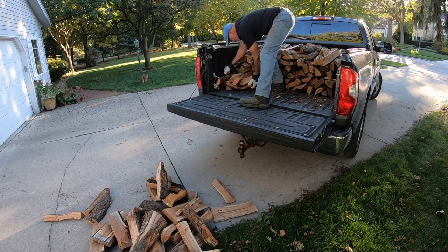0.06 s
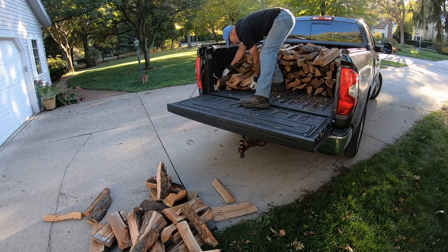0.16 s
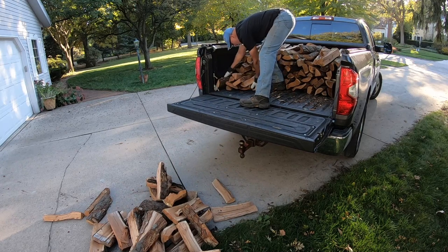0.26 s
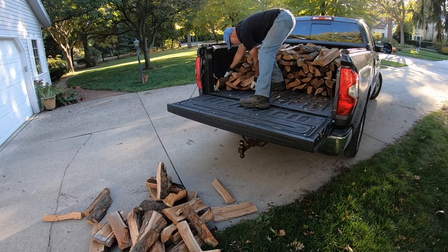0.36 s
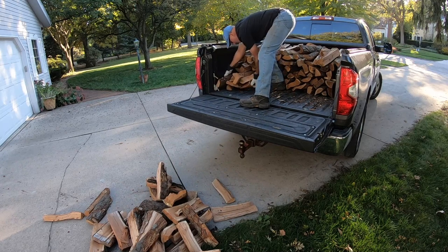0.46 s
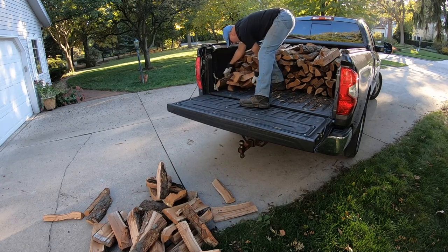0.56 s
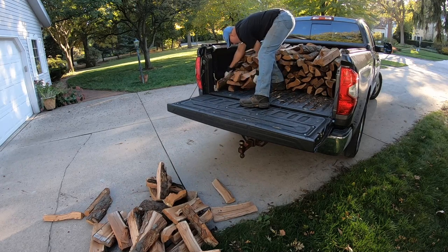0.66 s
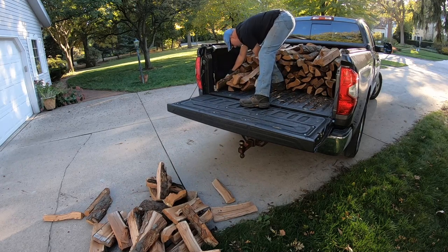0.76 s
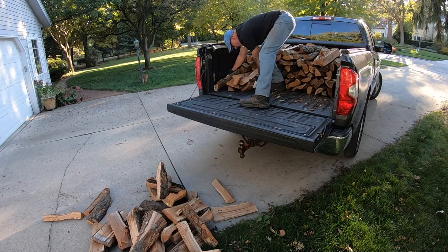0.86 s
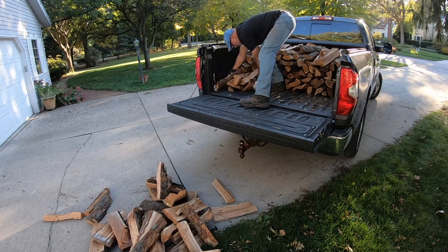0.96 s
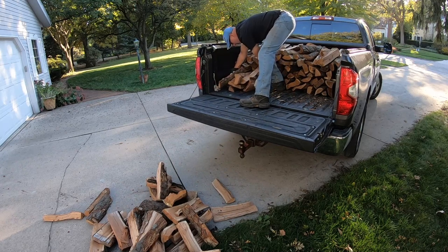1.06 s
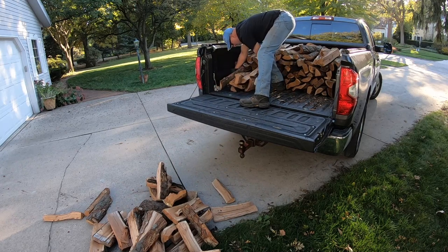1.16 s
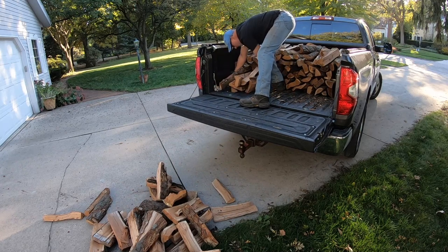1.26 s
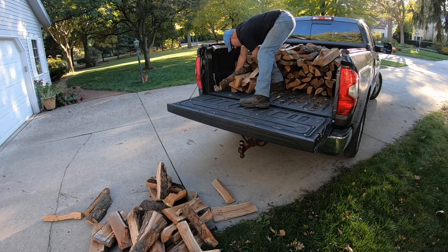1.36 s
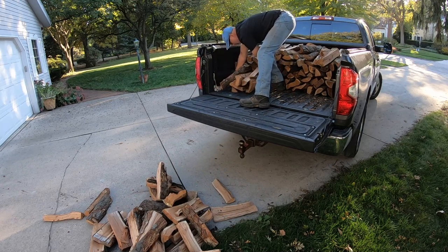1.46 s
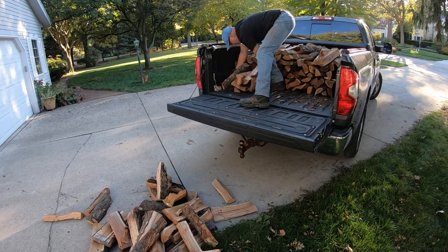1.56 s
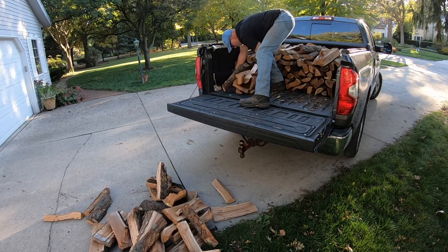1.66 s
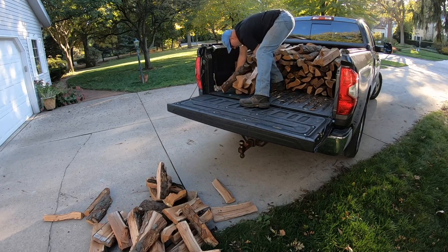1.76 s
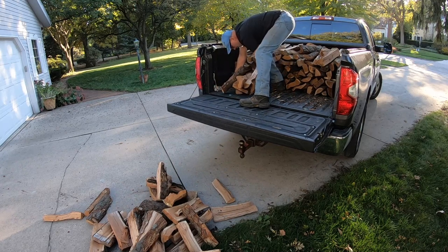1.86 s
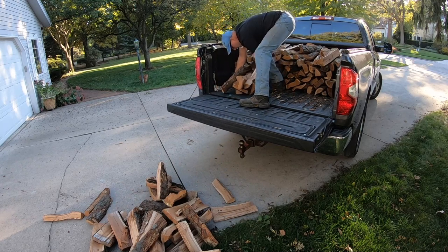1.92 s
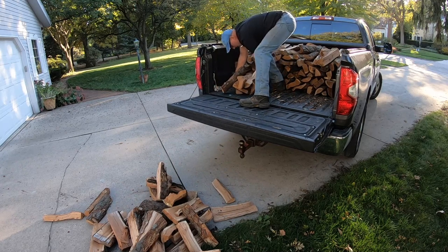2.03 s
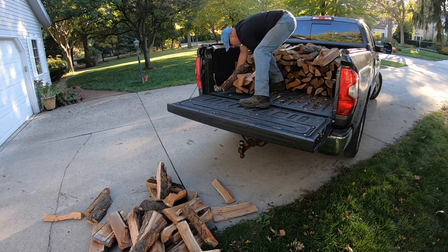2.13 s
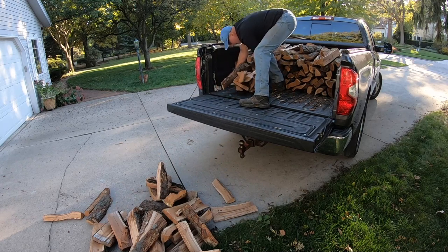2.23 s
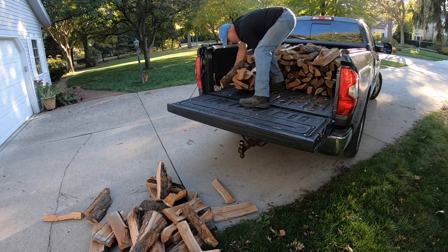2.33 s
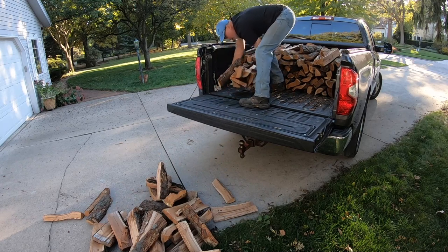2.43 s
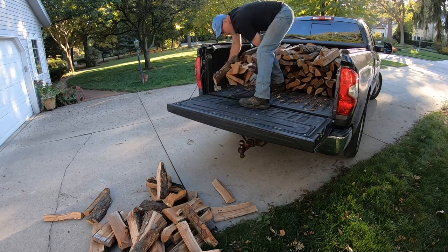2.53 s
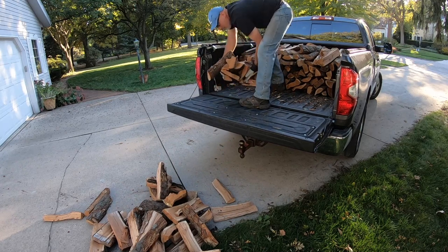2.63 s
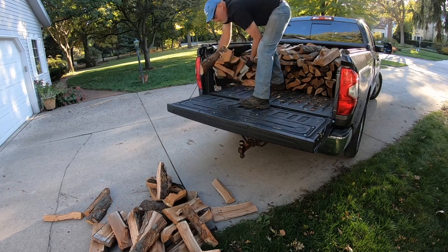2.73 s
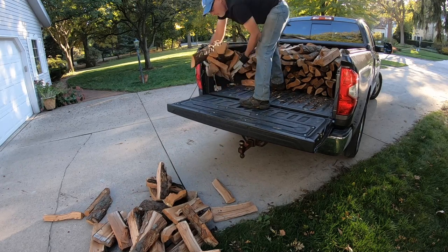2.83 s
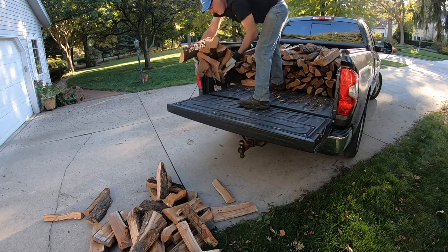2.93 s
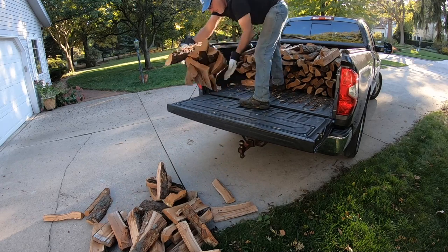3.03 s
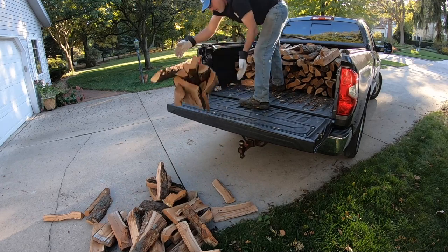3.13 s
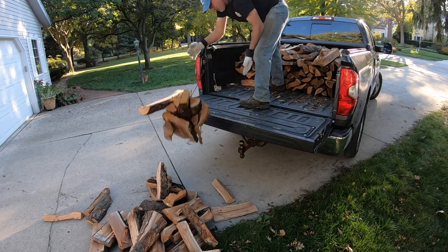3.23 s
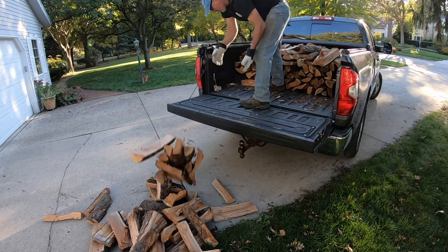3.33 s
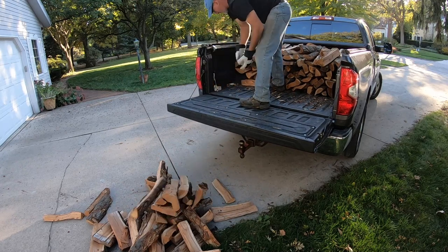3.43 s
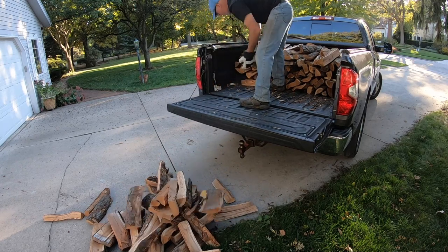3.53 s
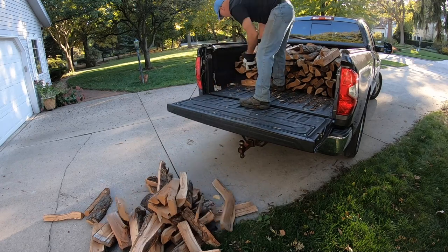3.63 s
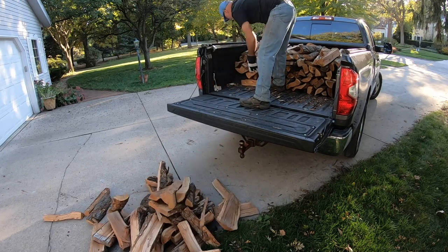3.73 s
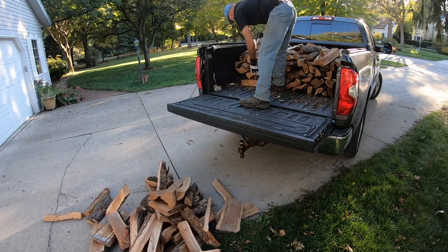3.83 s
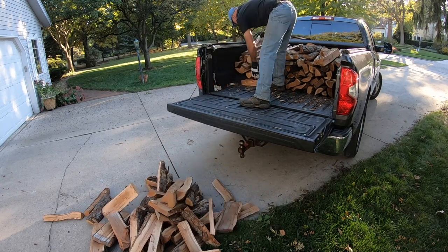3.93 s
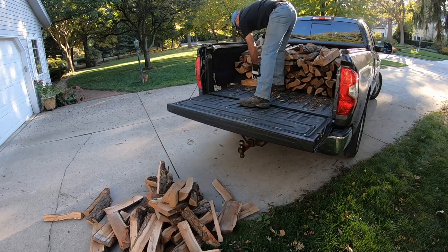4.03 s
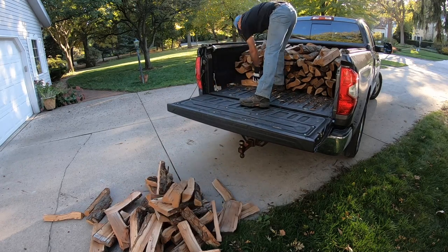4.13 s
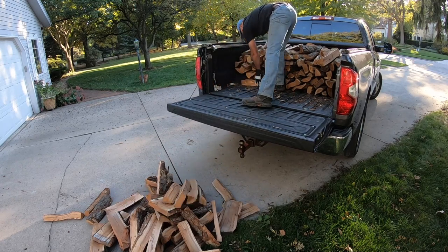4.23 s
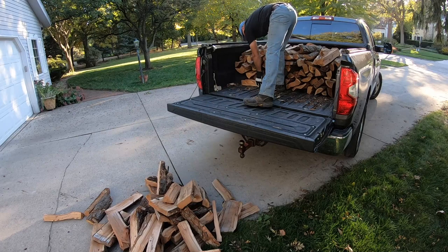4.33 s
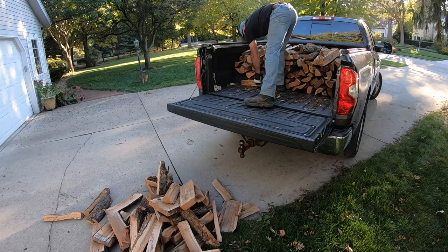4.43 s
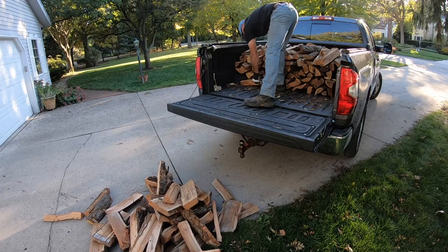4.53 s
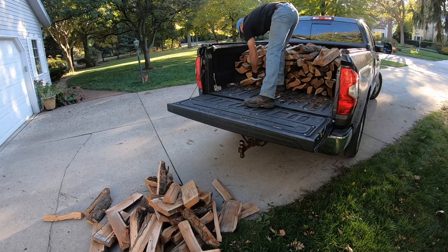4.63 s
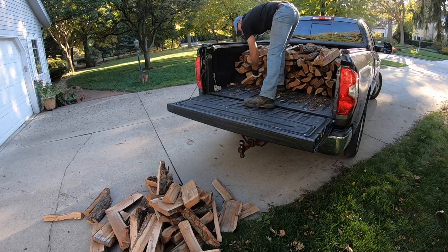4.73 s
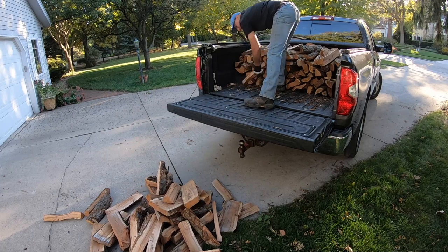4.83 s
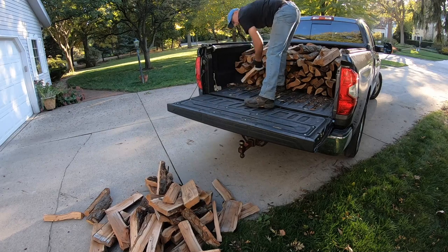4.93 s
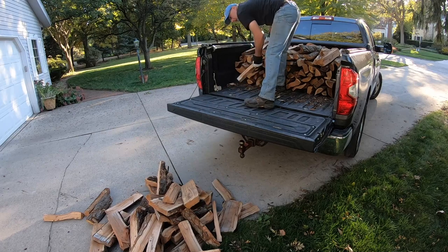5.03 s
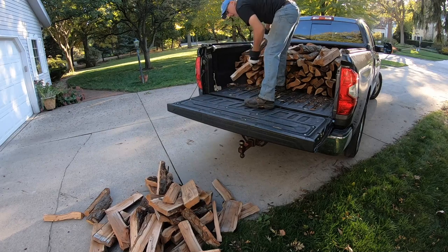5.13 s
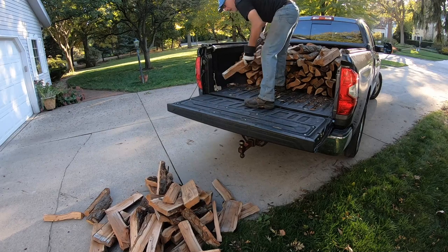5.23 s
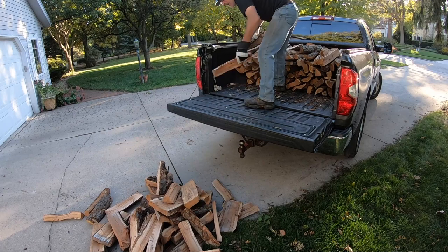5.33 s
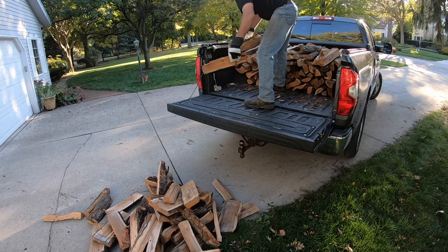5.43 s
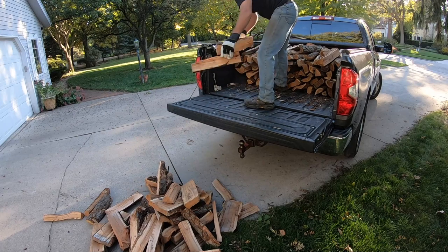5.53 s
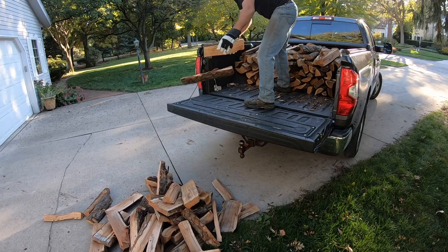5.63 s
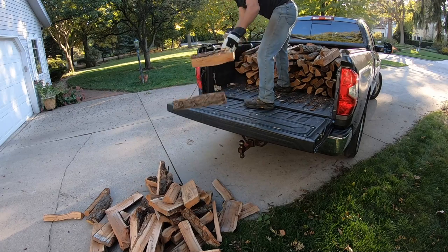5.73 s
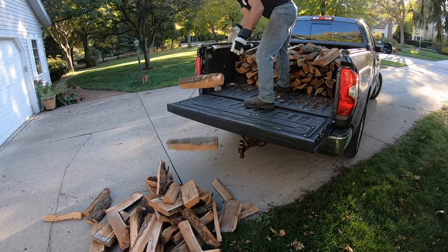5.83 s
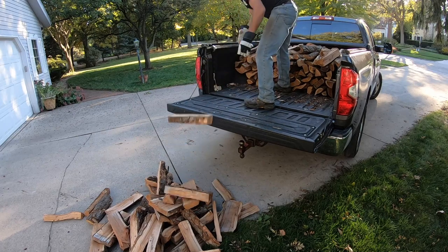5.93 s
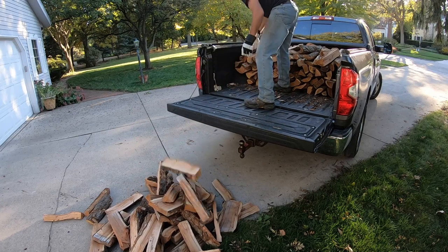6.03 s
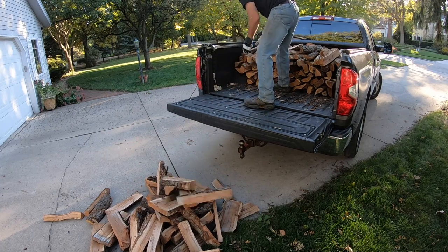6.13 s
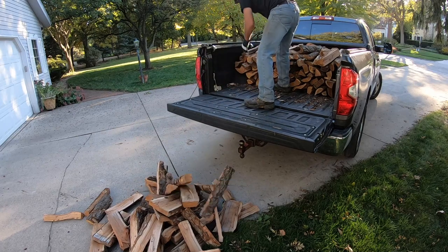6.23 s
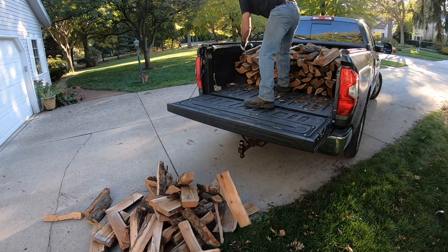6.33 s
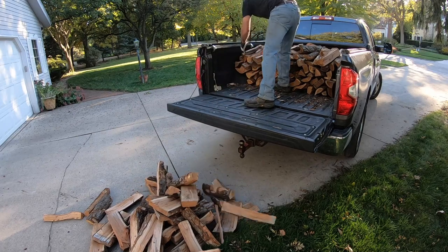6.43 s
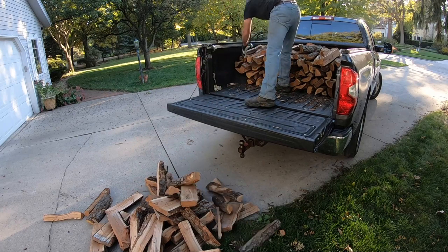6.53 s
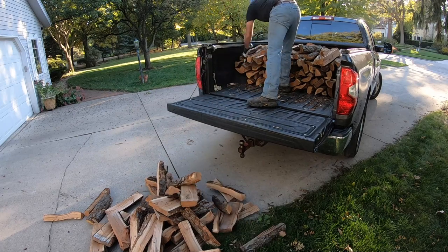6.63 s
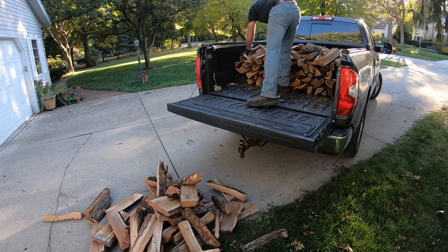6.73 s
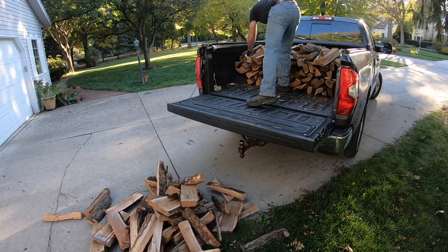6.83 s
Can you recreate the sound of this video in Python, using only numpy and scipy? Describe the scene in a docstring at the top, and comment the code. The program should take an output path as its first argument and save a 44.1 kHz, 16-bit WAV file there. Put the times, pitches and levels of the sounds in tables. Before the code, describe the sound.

Split logs drag and bump on a hollow truck bed, an armful crashes onto a woodpile on concrete, then two dry logs land ringing.

```python
"""Firewood off a pickup bed

Split logs drag and bump on the hollow bed, an armful crashes onto the pile on a concrete driveway
and settles, then two dry logs land and ring. Blows are bursts of decaying modes, irregular for each
log; dragging and sliding are dense random clicks, coloured and ridden in level. A noise tail throws
the blows back from the garage front, and steady coloured noise makes the quiet outdoor hush."""
import sys
import numpy as np
from scipy import signal
from scipy.fft import rfft, irfft, next_fast_len
from scipy.io import wavfile

SR = 44100
rng = np.random.default_rng(int(sys.argv[2]) if len(sys.argv) > 2 else 0)


def master_out(mix):
    """Clip the mix to full scale and print it as 16-bit PCM to the path in sys.argv[1]."""
    frames = np.transpose(np.atleast_2d(mix))
    ceiling = np.clip(frames, -1, 1)
    pcm = np.round(ceiling * 32767).astype(np.int16)
    wavfile.write(sys.argv[1], SR, pcm)


N = 302967
TIME = np.arange(N) / SR


def from_db(db):
    """Decibels to gain."""
    return 10 ** (np.asarray(db) / 20)


def rms_one(x):
    """Scale to unit rms."""
    return x / np.sqrt(np.mean(x ** 2) + 1e-20)


def in_time(rows):
    """Read each column of a time curve at every sample."""
    s, *columns = np.transpose(rows)
    return [np.interp(TIME, s, c) for c in columns]


def at_hz(points, hz):
    """Read a spectrum on a log-frequency axis."""
    f, value = np.transpose(points)
    return np.interp(np.log(hz + 1e-9), np.log(f), value)


def colour(x, spectrum):
    """Give a signal a smooth spectrum."""
    length = x.shape[-1]
    size = next_fast_len(length)
    gains = from_db(at_hz(spectrum, np.fft.rfftfreq(size, 1 / SR)))
    return irfft(rfft(x, size) * gains, size)[..., :length]


# stereo width over frequency: pitch_hz, side_minus_mid_db
WIDTH = [(30, 11), (70, -27.5), (180, -23.5), (380, -14), (750, -3.5), (2300, -8.5), (4400, -7),
         (9000, -8.5)]


def widen(pair):
    """Two unrelated signals become mid and side, spread by the width curve."""
    return pair[0] + colour(pair[1], WIDTH) * [[1], [-1]]


def panned(lean_db):
    """Left and right gains; a positive lean favours the left."""
    return from_db(np.array([[.5], [-.5]]) * lean_db)


def add(out, s, sound):
    """Mix a sound in at a time."""
    at = int(np.clip(round(s * SR), 0, N - 1))
    out[:, at:at + sound.shape[-1]] += sound[..., :N - at]


# relative spectrum of the outdoor air: pitch_hz, level_db (per Hz)
HUSH = [(20, -21.5), (60, 4.5), (100, -7.5), (160, 2.5), (400, -17.5), (800, -9), (1300, -6.5), (2000, -13),
        (3000, -21.5), (6000, -24.5), (10000, -48), (16000, -75)]
HUSH_DB = -53.5  # rms


def outdoor_hush():
    """Steady noise with most of its weight in the lows."""
    return from_db(HUSH_DB) * rms_one(colour(widen(rng.standard_normal((2, N))), HUSH))


def echoes(x, t60, delay_s, spectrum):
    """Scattered reflections that build up after each sound and die away."""
    t = np.arange(SR) / SR
    onset = 1 - np.exp(-(t / delay_s) ** 2)
    tail = widen(rng.standard_normal((2, SR))) * from_db(-60 * t / t60) * onset
    tail = colour(tail / np.sqrt(np.sum(tail[0] ** 2)), spectrum)
    return signal.fftconvolve(x, tail[:, :SR * 3 // 4], axes=1)[:, :N]


def garage_echo(direct):
    """The garage front throws the blows back as a soft, diffuse tail."""
    spectrum = [(100, -15.5), (500, -29.5), (1300, -22.5), (5000, -17), (8000, -18), (12000, -22)]
    return echoes(direct, t60=0.74, delay_s=0.0093, spectrum=spectrum)


def friction(spectrum, per_s, uneven_db):
    """Rough surfaces catch and slip: dense tiny clicks of uneven size, at unit rms."""
    clicks = rng.random(N) < per_s / SR
    sizes = from_db(uneven_db * np.minimum(rng.exponential(1, N), 4)) * clicks
    return rms_one(colour(widen(sizes * rng.standard_normal((2, N))), spectrum))


CATCHES_PER_S, CATCH_DB = 28, 2.5  # sliding wood catches and lets go


def catching():
    """Uneven stick and slip, as a wandering level in dB."""
    steps = rng.standard_normal(1000)
    return CATCH_DB * np.interp(TIME * CATCHES_PER_S, np.arange(len(steps)), steps)


SKID_ONSET_S = 0.0019  # wood takes a moment to start sliding


def dying_power(rows, fall_db_per_s):
    """Each event sets wood sliding with a power that builds quickly and that friction drains away."""
    kicks, keep = np.zeros(N), from_db(-fall_db_per_s / SR) ** 2
    for s, db, *_ in rows:
        kicks[int(np.clip(s * SR, 0, N - 1))] += from_db(db) ** 2
    lag = np.exp(-2 / (SKID_ONSET_S * SR))
    eased = signal.lfilter([(1 - lag) ** 2], [1, -2 * lag, lag ** 2], kicks + 1e-18)
    return signal.lfilter([1], [1, -keep], eased)


def skid(blows, share_db, fall_db_per_s):
    """Power of the short skid that follows every blow."""
    return from_db(share_db) ** 2 * dying_power(blows, fall_db_per_s)


# bark dragged over bark: start_s, length_s, level_db (before the layer trims)
SCRAPES = [(0.127, 0.085, -46.5), (0.575, 0.16, -52.5), (1.022, 0.24, -43), (1.55, 0.32, -40.5),
           (2.5, 0.11, -59), (2.944, 0.18, -58), (3.16, 0.083, -66.5), (3.82, 0.32, -52.5),
           (4.92, 0.19, -59.5), (5.521, 0.12, -55), (5.659, 0.083, -41.5), (6.585, 0.11, -42.5)]
SCRAPE_RUB_DB = -5  # the wood under the bark, relative to the scrape


def scrape_power():
    """Every pull speeds up and slows down in one smooth arch."""
    power = np.zeros(N)
    for s, length, db in SCRAPES:
        arch = np.sin(np.pi * np.clip((TIME - s) / length, 0, 1))
        power += (from_db(db) * arch) ** 2
    return power


# how hard the wood is being shifted, as the rumble it makes before trim: time_s, level_db
EFFORT = [(0, -33.5), (0.42, -39), (0.6, -31), (0.88, -31.5), (1.0, -40), (1.15, -33.5), (1.45, -34),
          (1.7, -43), (1.86, -34.5), (2.1, -38), (2.3, -44), (2.6, -43), (2.85, -62.5), (4.15, -61),
          (4.45, -41), (4.88, -55.5), (5.15, -53), (5.95, -57)]
# the pile is upset and small pieces trickle down: start_s, level_db (before the layer trims)
SLIDES = [(3.43, -43), (6.03, -49), (6.58, -49)]
SLIDE_FALL_DB_PER_S, SLIDE_RUB_DB, SLIDE_RUMBLE_DB = 19, 0, 1  # shares relative to the grit
REFERENCE_EFFORT_DB = -33
RUB_DB, GRIT_DB = -44, -48  # at the reference effort, before trims
GRIT_FOLLOWS = 1.25  # dB of grit per dB of effort: bark breaks more under a firm pull


def sliding_levels():
    """Levels in dB: shifting, skids after blows, scrapes and the settling pile add up in power."""
    effort_db, = in_time(EFFORT)
    pull_db = effort_db - REFERENCE_EFFORT_DB
    scrapes, slides = scrape_power(), dying_power(SLIDES, SLIDE_FALL_DB_PER_S)
    rumble = (from_db(effort_db) ** 2 + slides * from_db(SLIDE_RUMBLE_DB) ** 2
              + skid(BUMPS, share_db=-16.0, fall_db_per_s=129)
              + skid(THUMPS, share_db=-21.5, fall_db_per_s=124))
    rub = (from_db(RUB_DB + pull_db) ** 2 + slides * from_db(SLIDE_RUB_DB) ** 2
           + scrapes * from_db(SCRAPE_RUB_DB) ** 2
           + skid(KNOCKS, share_db=-29, fall_db_per_s=107))
    grit = (from_db(GRIT_DB + GRIT_FOLLOWS * pull_db) ** 2 + slides + scrapes
            + skid(SNAPS, share_db=-26.5, fall_db_per_s=229))
    catch_db = catching()
    return [10 * np.log10(power) + catch_db for power in (rumble, rub, grit)]


# relative spectrum of the low drag: pitch_hz, level_db (per Hz)
RUMBLE = [(30, -41), (52, -33), (80, 0), (120, -4.5), (190, 2), (280, -5.5), (400, -13), (700, -24.5),
          (1500, -73)]


def drag_rumble(rumble_db):
    """The low part of dragging and settling."""
    return from_db(rumble_db - 1.5) * friction(RUMBLE, per_s=980, uneven_db=1.0)


# relative spectrum of wood rubbing on wood: pitch_hz, level_db (per Hz)
RUB = [(250, -10), (450, -23), (800, -0.5), (1250, 1.5), (1800, -3), (2500, -8.5), (4000, -32.5)]


def wood_rub(rub_db):
    """The woody midrange of sliding logs."""
    return from_db(rub_db - 2.0) * friction(RUB, per_s=3000, uneven_db=3.0)


# whether the wood is moved between the walls of the bed: time_s, share (0-1)
IN_TRUCK = [(0, 1), (3.3, 1), (3.4, 0), (4.2, 0), (4.3, 1), (5.9, 1), (6, 0)]
# relative spectra of crumbling bark, on the pile and in the bed: pitch_hz, level_db (per Hz)
GRIT = [(1300, 2.5), (2400, 3.5), (3500, 2), (5800, 1.5), (7500, -4), (10000, -8.5), (13000, -42),
        (16000, -33)]
BED_GRIT = [(1300, -4), (2400, 3), (3500, -0.5), (5800, -3), (7500, -6.5), (10000, -8), (13000, -26),
            (16000, -33)]


def bark_grit(grit_db):
    """Crumbling bark, crossfaded between its colour in the bed and on the pile."""
    in_truck, = in_time(IN_TRUCK)
    in_bed = in_truck * friction(BED_GRIT, per_s=4000, uneven_db=1.0)
    on_pile = (1 - in_truck) * friction(GRIT, per_s=6300, uneven_db=3.5)
    return from_db(grit_db + 2.0) * (in_bed + on_pile) * panned(lean_db=-1.0)


def swell(s, db, rise_db_per_s, fall_db_per_s):
    """Gain that climbs to a peak and falls away."""
    return from_db(db - np.maximum(rise_db_per_s * (s - TIME), fall_db_per_s * (TIME - s)))


def rasp():
    """A log drawn out of the stack: split faces rub and sound two narrow resonances."""
    spectrum = [(600, -19.5), (900, 4.5), (1350, -26), (1700, 7.0), (2200, -11), (6000, -21.5),
                (12000, -54.5)]
    rubbing = friction(spectrum, per_s=2200, uneven_db=0.0)
    return swell(5.06, db=-44, rise_db_per_s=280, fall_db_per_s=115) * rubbing


def chip():
    """A chip of bark skids over the bed: a thin, bright scratch."""
    spectrum = [(3000, -22), (5500, -4), (6500, 2), (8500, -2), (10500, -14), (15000, -29)]
    scratch = friction(spectrum, per_s=5300, uneven_db=2)
    gain = swell(4.769, db=-41.5, rise_db_per_s=5002, fall_db_per_s=420)
    return gain * scratch * panned(lean_db=-6.0)


def strike(hz, gains, t60, contact_s):
    """Decaying modes that swell over the contact time, each at its own phase."""
    t60 = np.clip(t60, .004, .6)
    t = np.arange(int(np.max(t60) * SR)) / SR
    phase = rng.uniform(0, 2 * np.pi, (len(hz), 1))
    tones = np.sin((2 * np.pi * hz[:, None] * t + phase).astype(np.float32))
    decays = np.exp((-np.log(1000) * t / t60[:, None]).astype(np.float32))
    return gains @ (tones * decays) * (1 - np.exp(-t / contact_s))


def at_level(sound, db, t60):
    """Give a blow the energy of a decaying sine of that height."""
    sine_energy = t60 * SR / (4 * np.log(1000))
    return sound * from_db(db) * np.sqrt(sine_energy / np.mean(np.sum(sound ** 2, axis=-1)))


def bell(hz, centre_hz, octaves):
    """A blow favours the modes near its centre."""
    return 1 / (1 + (np.log2(hz / centre_hz) / octaves) ** 2)


def log_blow(centre_hz, t60, span, octaves, damping, contact_s, count):
    """Every split log has irregular modes of its own; the higher ones die sooner."""
    low_hz, high_hz = span[0][0], span[-1][0]
    hz = low_hz * (high_hz / low_hz) ** ((np.arange(count) + rng.random(count)) / count)
    mid = rng.uniform(0.35, 1, count)
    side = rng.normal(0, 0.26, count) * from_db(at_hz(WIDTH, hz))
    weights = bell(hz, centre_hz, octaves) * from_db(at_hz(span, hz))
    gains = np.array([mid + side, mid - side]) * weights
    return strike(hz, gains, t60 * (centre_hz / hz) ** damping, contact_s)


def scattered(blow, s, pile_db, truck_db, t60):
    """Each blow finds its own short reflections, stronger between the walls of the bed."""
    t = np.arange(SR // 5) / SR
    tail = rng.standard_normal(len(t)) * from_db(-60 * t / t60) * (1 - np.exp(-t / 0.0025))
    wet = from_db(pile_db + (truck_db - pile_db) * np.interp(s, *np.transpose(IN_TRUCK)))
    paths = wet * tail / np.sqrt(np.sum(tail ** 2)) + (t == 0)  # the direct path comes first
    return signal.fftconvolve(blow, paths[None], axes=1) / np.sqrt(1 + wet ** 2)


def clatter(level_db, body, per_s, t60, uneven_db, count):
    """Small pieces tap one another at random while the wood is on the move."""
    out, tries = np.zeros((2, N)), 900
    for when, pitch, chance, size in rng.random((tries, 4)):
        db = level_db[int(when * N)]
        moving = np.clip((db + 60) / 10, 0, 1)
        if chance < moving * per_s * N / SR / tries:
            hz = body[1][0] * (body[-2][0] / body[1][0]) ** pitch
            tap = log_blow(hz, t60, body, octaves=0.35, damping=0.132, contact_s=0.00017, count=count)
            tap_db = db + at_hz(body, hz) + uneven_db * (size - 1)
            add(out, when * N / SR, at_level(tap, tap_db, t60))
    return out


# logs and boots bumping the bed: start_s, level_db (before trim), pitch_hz
BUMPS = [(0.002, -19.5, 231.5), (0.2, -20.5, 170), (0.374, -14.5, 104.9), (0.614, -25, 210),
         (0.64, -11.5, 200), (0.725, -17.5, 177), (0.762, -15, 108), (0.869, -20, 276.7),
         (1.101, -19, 177.6), (1.173, -19.5, 218), (1.233, -15, 166), (1.269, -15.5, 195),
         (1.312, -11, 186), (1.375, -6, 227), (1.409, -12.5, 240.1), (1.737, -14, 199), (1.783, -8.5, 161),
         (1.848, -6, 173), (1.881, -12, 252), (1.968, -12, 306), (2.009, -20.5, 313), (2.366, -19.5, 119),
         (2.395, -13.5, 110), (2.42, -19, 263), (2.549, -23.5, 86), (2.59, -22, 236), (3.853, -20, 237),
         (4.131, -16, 215), (4.289, -33.5, 230), (4.392, -33, 244), (4.568, -32, 287), (4.595, -31.5, 215),
         (5.4, -38, 194.5), (5.599, -31.5, 172), (5.68, -29.5, 199)]
# panels of the bed, before the load detunes them: pitch_hz, level_db
BED_MODES = [(76, -1), (86, -11.5), (113, 0.5), (135, -5.5), (156, 2), (178, -5.5), (194, -1), (212, -0.5),
             (248, 2), (272, 1), (312, 2.5), (350, 2), (405, 0), (465, 0), (544, -1), (620, 4), (690, 15),
             (818, 11)]


def bed_bumps(t60=0.18):
    """Soft, heavy blows boom in the panels of the bed."""
    out, (hz, mode_db) = np.zeros((2, N)), np.transpose(BED_MODES)
    for s, db, centre_hz in BUMPS:
        uneven_db = rng.normal(0, 2.8, len(hz))
        gains = from_db(mode_db + uneven_db) * bell(hz, centre_hz, octaves=0.78) ** 2
        loaded_hz = hz * (1 + 0.029 * rng.standard_normal(len(hz)))  # the shifting load detunes the panels
        blow = strike(loaded_hz, gains, t60 * (centre_hz / hz) ** 0.047, contact_s=0.0046)
        add(out, s, at_level(blow, db - 3.5, t60) * panned(lean_db=-0.6))
    # open panels radiate little below their first mode
    return signal.sosfilt(signal.butter(3, 68, "high", fs=SR, output="sos"), out + 1e-18)


# logs landing with their weight on pile and slab: start_s, level_db (before trim), pitch_hz
THUMPS = [(3.453, -12, 266), (3.485, -9.5, 264), (3.5, -13.5, 202), (3.518, -15, 170), (3.62, -26.5, 252.8),
          (3.736, -20.5, 157), (3.912, -22.5, 258), (6.033, -15.5, 231), (6.155, -18.5, 229),
          (6.175, -15, 91.5), (6.572, -28.5, 288), (6.649, -27, 106)]


def thumps(t60=0.12):
    """The mass of a landing log shakes the pile; the lowest part lingers."""
    out = np.zeros((2, N))
    body = [(28, -18), (38, -8), (52, -9), (75, -3), (120, -6.5), (300, 1), (450, -1.5)]
    for s, db, hz in THUMPS:
        blow = log_blow(hz, t60, body, octaves=1.47, damping=0.93, contact_s=0.0017, count=24)
        add(out, s, at_level(blow, db - 1.0, t60))
    return out


# free modes of the dry pieces, by name: pitch_hz, level_db, t60_s
LOG_MODES = { "long": [(598, -13, .2), (840, -12, .15), (931, 0, .2), (1240, -1, .24), (1744, -21, .13),
             (2150, -24, .13), (2299, -23, .13)], "heavy": [(483, -11, 0.17), (773, -8, 0.11),
             (830, -13, 0.24), (1003, -7, 0.11), (1365, 5, 0.034), (1533, 3.5, 0.06)],
             "short": [(583, -14, 0.089), (1067, 0.5, 0.077), (1981, -30, 0.063)],
             "splinter": [(3220, -9, 0.028), (3750, 3, 0.017), (4175, 6.5, 0.016), (4180, -4, 0.022),
             (4870, 3.5, 0.015), (5600, -9, 0.023)], }
# blows that leave a piece ringing: start_s, piece, level_db (added to its modes)
RINGS = [(3.469, "splinter", -11.5), (3.529, "short", -30), (3.914, "short", -33), (3.950, "short", -30),
         (4.135, "short", -23), (6.030, "long", -12.5), (6.155, "heavy", -15), (6.2, "heavy", -28),
         (6.652, "long", -32.5)]


def ringing_logs():
    """A dry piece that bounces clear keeps ringing at its own pitches."""
    out = np.zeros((2, N))
    for s, piece, db in RINGS:
        hz, mode_db, t60 = np.transpose(LOG_MODES[piece])
        add(out, s, strike(hz, from_db(db + mode_db), t60, contact_s=0.0011))
    return out


# hard edges and splinters snapping together: start_s, level_db (before trim), pitch_hz
SNAPS = [(0.103, -24, 5090), (0.478, -36.5, 4870), (0.546, -21.5, 3230), (0.691, -25.5, 2650),
         (0.737, -20.5, 2230), (0.874, -18, 2400), (1.109, -16.5, 2610), (1.135, -19, 2740),
         (1.358, -26.5, 3630), (1.601, -12, 5530), (1.833, -17, 3220), (1.846, -17.5, 2870),
         (2.011, -19, 2920), (2.121, -29, 4120), (2.179, -26.5, 2550), (2.254, -35, 6060),
         (2.326, -27.5, 4630), (3.425, -27, 2220), (3.448, -22.5, 3220), (3.469, -14, 4130),
         (3.487, -13, 2600), (3.496, -14.5, 2280), (3.513, -15, 2620), (3.547, -20, 2670),
         (3.661, -25, 3400), (3.734, -13, 5030), (3.755, -23, 2170), (3.946, -27.5, 4160),
         (4.01, -34.5, 4380), (4.133, -22.5, 3210), (4.245, -27, 2800), (4.288, -29.5, 2820),
         (4.441, -27.5, 4150), (4.473, -24.5, 2180), (4.621, -35, 3800), (4.769, -40.5, 6770),
         (5.68, -14, 3060), (6.026, -19, 2710), (6.035, -14.5, 5840), (6.135, -16, 5000),
         (6.146, -13, 5660), (6.156, -38.5, 2340), (6.445, -31.5, 5150), (6.485, -18.5, 5960),
         (6.581, -21, 3020), (6.628, -22.5, 5000), (6.651, -24, 2130), (6.69, -27, 4580),
         (6.792, -21.5, 3836)]
# how strongly the logs answer a hard contact: pitch_hz, level_db
SNAP_BODY = [(1800, 5), (2800, 2.5), (5900, 4.5), (7400, -11.5), (10500, -10), (15000, -23)]


def snaps(t60=0.023, bark_db=5):
    """Hard, brief contacts reach the high cross-grain modes; bark tearing in the stack adds top."""
    out = np.zeros((2, N))
    for s, db, hz in SNAPS:
        tearing_db = bark_db * np.interp(s, *np.transpose(IN_TRUCK))
        body = [(f, level + tearing_db * (f > 7000)) for f, level in SNAP_BODY]
        blow = log_blow(hz, t60, body, octaves=0.97, damping=0.14, contact_s=0.0007, count=170)
        blow = scattered(blow, s, pile_db=-6, truck_db=0, t60=0.13)
        add(out, s, at_level(blow, db - 2.5, t60))
    return out


# wood knocking on wood: start_s, level_db (before trim), pitch_hz
KNOCKS = [(0.004, -20, 415), (0.191, -22, 480), (0.545, -23.5, 1190), (0.74, -21.5, 1223),
          (0.764, -20.5, 1020), (0.876, -18, 775), (1.143, -20.5, 1000), (1.159, -21.5, 1020),
          (1.244, -21.5, 520), (1.371, -8.5, 427), (1.6, -22, 2000), (1.768, -9.5, 1320),
          (1.785, -12.5, 890), (1.841, -13.5, 574), (1.973, -16, 434), (2.123, -28.5, 1290),
          (2.387, -21.5, 430), (3.424, -24.5, 910), (3.449, -2.5, 569), (3.48, -7, 633), (3.486, -6, 620),
          (3.499, -14, 523), (3.516, -14.5, 848), (3.525, -12, 1130), (3.546, -12, 496), (3.627, -25, 950),
          (3.738, -17, 1100), (3.755, -17.5, 1070), (3.781, -20.5, 750), (3.828, -25, 393),
          (3.91, -19.5, 714), (3.944, -23.5, 714), (4.133, -21.5, 935), (4.309, -30, 1320),
          (4.401, -28.5, 958), (4.424, -24.5, 440), (4.512, -29.5, 1020), (4.57, -30.5, 700),
          (5.401, -43, 1170), (5.589, -33, 1187), (5.68, -17.5, 1500), (6.029, -5, 1236),
          (6.065, -10, 1260), (6.139, -13.5, 1450), (6.155, -7, 1200), (6.176, -14.5, 638),
          (6.197, -9.5, 930), (6.356, -33, 416), (6.546, -29, 979), (6.58, -26, 790), (6.652, -22, 1020),
          (6.794, -32, 830)]
# how strongly the logs answer a dull contact: pitch_hz, level_db
KNOCK_BODY = [(280, -1.5), (500, -1.5), (1300, 0.5), (1800, -7.5), (3000, 1)]


def knocks(t60=0.057):
    """Bending modes give short, hollow clacks; in the tight stack several logs answer at once."""
    out = np.zeros((2, N))
    for s, db, hz in KNOCKS:
        in_stack = np.interp(s, *np.transpose(IN_TRUCK)) > .5
        count = 40 if in_stack else 15
        blow = log_blow(hz, t60, KNOCK_BODY, octaves=0.62, damping=0.34, contact_s=0.00046, count=count)
        blow = scattered(blow, s, pile_db=-9, truck_db=0, t60=0.15)
        add(out, s, at_level(blow, db - 2.0, t60))
    return out


# which side the wood favours: pitch_hz, left_minus_right_db
LEAN = [(350, -3), (700, 1), (1300, 1.5), (2400, 1.5), (4400, -4), (9000, -26.5)]


def leaned(wood):
    """Tilt the stereo balance of the wood differently at each pitch."""
    sides = zip(wood, (.5, -.5))
    return np.array([colour(ch, [(hz, side * db) for hz, db in LEAN]) for ch, side in sides])


def scene():
    """Blows, small clatter and dragging, the yard's echo and hush."""
    rumble_db, rub_db, grit_db = sliding_levels()
    dragging = drag_rumble(rumble_db) + wood_rub(rub_db) + bark_grit(grit_db)
    taps = clatter(rub_db + 10, KNOCK_BODY, per_s=50, t60=0.12, uneven_db=15.5, count=5)
    ticks = clatter(grit_db + 12.5, SNAP_BODY, per_s=76, t60=0.034, uneven_db=14, count=20)
    wood = leaned(knocks() + snaps() + ringing_logs() + taps + ticks)
    direct = wood + bed_bumps() + thumps()
    return outdoor_hush() + garage_echo(direct) + dragging + rasp() + chip() + direct


def record(dry):
    """The highest peaks are rounded and the top is cut."""
    rounded = 1.5 * np.tanh(dry / 1.5)
    top_cut = signal.cheby2(12, 70, 16700, fs=SR, output="sos")  # 70 dB down from 16.7 kHz
    return signal.sosfilt(top_cut, rounded)


dry = scene()
out = record(dry)
master_out(out)
```